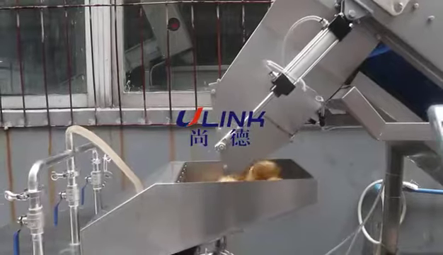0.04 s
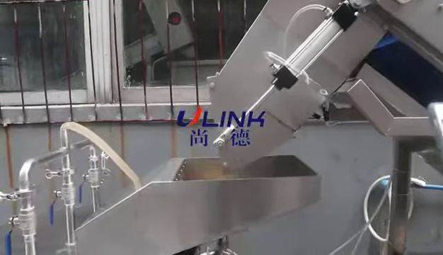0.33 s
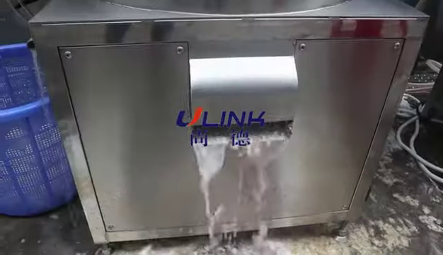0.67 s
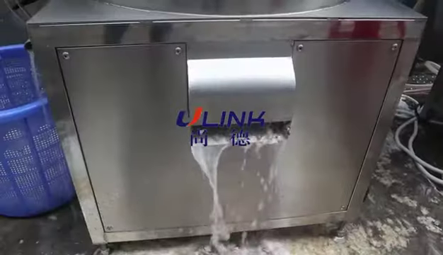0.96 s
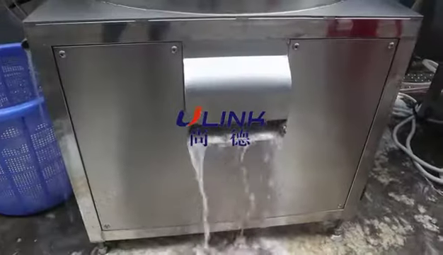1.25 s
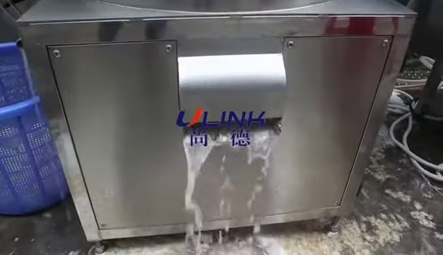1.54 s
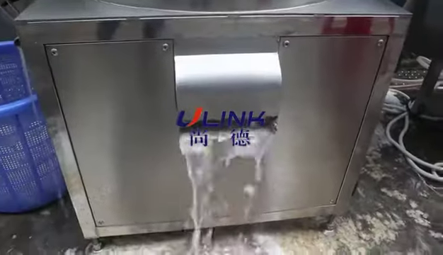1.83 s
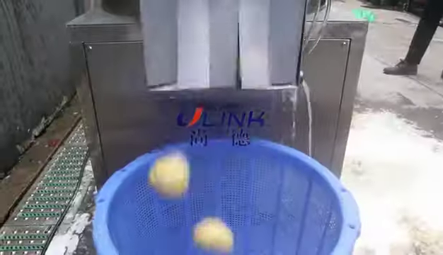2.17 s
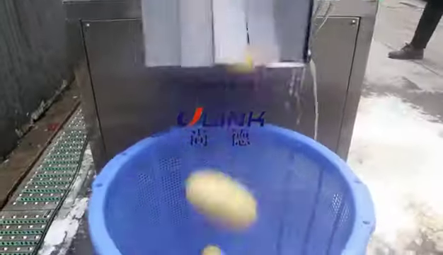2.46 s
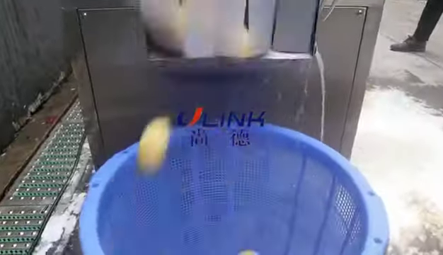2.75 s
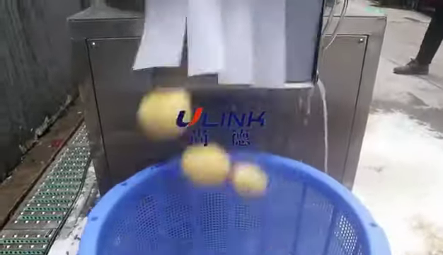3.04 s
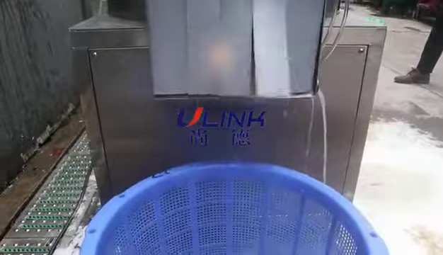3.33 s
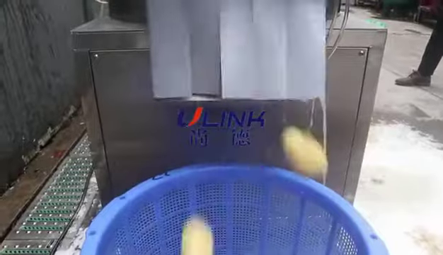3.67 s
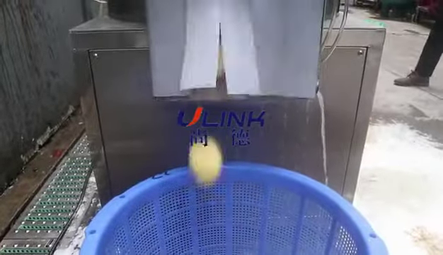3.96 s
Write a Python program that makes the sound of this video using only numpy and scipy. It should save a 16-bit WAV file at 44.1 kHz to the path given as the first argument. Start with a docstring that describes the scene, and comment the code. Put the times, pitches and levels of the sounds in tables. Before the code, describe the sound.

A potato washing machine rumbles and hums as potatoes tumble and thud in its steel drum and water splashes. Later, potatoes clang on a steel chute and knock into a plastic basket, heard nearby in a factory yard.

```python
"""A factory yard, where a potato washer is heard from three places in turn: hopper, drain and outlet.
Potatoes tumble, rub and thud in the steel drum over the rumble and hum of the drive.
Water splashes, bubbles and surges, and wet steel panels ring thinly. The level dips briefly
before the drain. At the outlet, potatoes bang on a steel chute and drop into a plastic basket."""
import sys
import numpy as np
from scipy import signal
from scipy.fft import rfft, irfft
from scipy.io import wavfile
from scipy.ndimage import uniform_filter1d

SR = 44100
rng = np.random.default_rng(int(sys.argv[2]) if len(sys.argv) > 2 else 0)


def file_out(sig):
    """Save sig as 16-bit WAV at sys.argv[1]."""
    # one column per channel
    cols = np.atleast_2d(sig).T
    # limit, then scale
    lim = np.clip(cols, -1, 1)
    pcm = np.round(lim * 32767).astype(np.int16)
    wavfile.write(sys.argv[1], SR, pcm)


N = 176400
T = np.arange(N) / SR


def gain(db):
    """Turn decibels into a number to multiply by."""
    return 10 ** (np.asarray(db) / 20)


def unit(x):
    """Scale a sound to an average (rms) level of 1."""
    return x / np.sqrt(np.mean(x ** 2) + 1e-18)


def unit_hit(x):
    """Give one hit the energy of 40 ms of sound at level 1."""
    return x / np.sqrt(np.sum(x ** 2) / (.04 * SR))


def curve(rows):
    """Join (seconds, dB) points into a changing gain."""
    return gain(np.interp(T, *np.array(rows).T))


def wander(rate):
    """Drift at random, taking `rate` new turns a second."""
    step = int(SR / rate)
    held = np.repeat(rng.standard_normal(N // step + 1), step)
    return unit(uniform_filter1d(held, step)[:N])


def colour(x, points):
    """Shape a sound by (Hz, dB) points; beyond them it falls 24 dB an octave."""
    hz, db = np.array(points).T
    octave = np.log2(np.maximum(np.fft.rfftfreq(N, 1 / SR), 1))
    outside = np.abs(octave - np.clip(octave, np.log2(hz[0]), np.log2(hz[-1])))
    return irfft(rfft(x) * gain(np.interp(octave, np.log2(hz), db) - 24 * outside), N)


def ring(x, notes):
    """Make an object ring at its (Hz, width in Hz, dB) notes; narrow ones last longer."""
    return sum(gain(db) * signal.lfilter(*signal.iirpeak(hz, hz / width, fs=SR), x)
               for hz, width, db in notes)


def soften(x, hz):
    """Soft flesh dulls a blow above this frequency."""
    return signal.sosfilt(signal.butter(2, min(hz, .4 * SR), fs=SR, output="sos"), x)


def taps(per_second, spread_db):
    """Tiny random blows of uneven size."""
    happens = rng.random(N) < per_second / SR
    size = np.minimum(rng.exponential(size=N), 4)
    return happens * rng.choice([-1, 1], N) * gain(spread_db * size)


def burst(start, decay_s, rise_s=.005):
    """Noise that builds quickly and dies away."""
    age = np.maximum(T - start, 0)
    return rng.standard_normal(N) * (1 - np.exp(-age / rise_s)) * np.exp(-np.minimum(age / decay_s, 20))


def strike(start, decay_s=.005, rub_db=-6):
    """A firm blow, then the rough rub of the skin."""
    rub = burst(start, decay_s)
    return signal.unit_impulse(N, int(start * SR)) + gain(rub_db) * rub / np.sqrt(np.sum(rub ** 2))


# The drum's notes at each place. Each row: pitch in Hz, width in Hz, strength in dB.
HOPPER_NOTES = [(203, 27, -1), (254, 28, -0.5), (277.9, 16, 13.5), (356.6, 9.1, 7.5)]
DRAIN_NOTES = [(196.8, 9.2, -0.5), (247.7, 12, 3.5), (274.8, 16, 1.5), (546.4, 7.8, -2.5)]
OUTLET_NOTES = [(65, 14, 6), (115, 26, 0), (264.6, 27, 6), (327, 16, 8.5), (363.5, 11, 2.5),
                (620, 110, -8.5)]
# How loud the tumbling is. Each row: time in seconds, level in dB.
TUMBLE_LEVEL = [(0, -22), (.25, -17), (.6, -15), (.85, -21), (1.3, -16.5), (1.75, -23), (2.05, -14),
                (2.14, -20.5), (2.3, -15.5), (2.43, -21.5), (2.52, -15), (2.68, -20.5), (3.2, -28),
                (3.47, -39.5), (3.58, -21), (3.71, -27), (4, -20.5)]

def tumbling(notes):
    """Many soft potato knocks keep the steel drum ringing."""
    knocks = soften(taps(per_second=300, spread_db=2.2), hz=505)
    return unit(ring(knocks, notes)) * curve(TUMBLE_LEVEL)


# The rumble's tone. Each row: frequency in Hz, strength in dB.
RUMBLE_TONE = [(34, 3), (50, -2), (115, 2.5), (160, -6.5), (300, 1.5), (450, -18.5), (850, -27)]
# Its level in dB at the hopper, drain and outlet.
RUMBLE_DB = (-23, -22.5, -23)

def rumble(place):
    """The drive and frame shake with a deep noise."""
    return gain(RUMBLE_DB[place]) * unit(colour(rng.standard_normal(N), RUMBLE_TONE))


# The drive's tones. Each row: pitch in Hz, level in dB.
HUM_NOTES = [(52, -33), (93, -34)]

def drive_hum(waver=.015):
    """The drive hums low, wavering a little in pitch."""
    out = 0
    for hz, db in HUM_NOTES:
        pitch = hz * (1 + waver * wander(10))
        out += gain(db) * unit(np.sin(2 * np.pi * np.cumsum(pitch) / SR))
    return out


def bubbles(per_second=260, cycles=26, rise=.12):
    """Each bubble gives a rising ping; higher ones are shorter and weaker."""
    out = np.zeros(N + SR)
    for when, pitch, size in rng.random((int(per_second * N / SR), 3)):
        hz = 700 * 7 ** pitch
        age = np.arange(int(2 * cycles * SR / hz)) * hz / SR / cycles
        ping = np.sin(2 * np.pi * cycles * age * (1 + rise * age / 2))
        start = int(when * N)
        out[start:start + len(age)] += size ** 2 * np.exp(-3 * age) * ping * 700 / hz
    return unit(out[:N])


# The tone of the splashing. Each row: frequency in Hz, strength in dB.
SPLASH_TONE = [(300, 6), (600, 7.5), (1000, -1), (1600, -3.5), (2600, -7), (3400, -11.5), (4800, -21.5),
               (7600, -25.5)]
# The flow of water. Each row: time in seconds, level in dB.
FLOW_LEVEL = [(0, -33.5), (.4, -30.5), (.85, -29), (1.05, -28), (2.05, -27.5), (2.4, -27.5), (2.58, -24),
              (2.8, -28.5), (2.92, -30.5), (3.17, -33.5), (3.3, -29.5), (3.48, -32), (3.59, -26.5),
              (3.7, -30.5), (3.9, -24), (4, -27.5)]

def splashing(flicker_db=1.4, bubble_db=-10):
    """Thousands of drops and some bubbles swell and fade with the flow."""
    drops = unit(colour(taps(per_second=5000, spread_db=2), SPLASH_TONE))
    flicker = gain(flicker_db * wander(25.02))
    return curve(FLOW_LEVEL) * (drops * flicker + gain(bubble_db) * bubbles())


# The panels' notes. Each row: pitch in Hz, width in Hz, strength in dB.
PANEL_NOTES = [(1254, 37, 9.5), (1836, 70, -3), (2482, 7.3, -1), (4210, 21, -3.5)]

def panels(db):
    """Tiny taps make the wet steel panels ring thinly."""
    return gain(db) * unit(ring(taps(per_second=300, spread_db=2.2), PANEL_NOTES))


def swell(peak, half_length):
    """A smooth rise and fall around one moment."""
    return np.exp(-((T - peak) / half_length) ** 2 / 2)


# Drum groans. Each row: peak time in seconds, half length in seconds, pitch in Hz, level in dB.
GROANS = [(0.415, 0.32, 284.9, -25), (.43, 0.12, 745, -30.5), (0.959, 0.042, 271.1, -15.5),
          (1.603, 0.2, 273, -17)]

def groans(wander_hz=7.016, flutter_db=.5):
    """Potatoes stick and slip on the drum wall, drawing out an unsteady tone."""
    out = 0
    for peak, half_length, hz, db in GROANS:
        tone = np.sin(2 * np.pi * np.cumsum(hz + wander_hz * wander(45)) / SR)
        out += gain(db) * swell(peak, half_length) * unit(tone * gain(flutter_db * wander(40)))
    return out


# Thuds in the drum. Each row: start in seconds, level in dB, pitch in Hz.
THUDS = [(0.706, -11, 222.7), (0.723, -13, 241.4), (0.745, -18.5, 245.5), (.82, -19.5, 262.6),
         (1.23, -20.5, 238.5), (1.286, -15, 290), (1.399, -15, 263.3), (1.52, -13, 243), (1.59, -15, 258),
         (1.819, -17, 268.5), (1.96, -21.5, 301), (2.521, -18.5, 333), (2.60, -16, 280),
         (3.329, -25.5, 256), (3.527, -21.5, 325.5), (3.787, -18, 339.5), (3.85, -18.5, 351.5)]
# The wall's notes. Each row: multiple of the thud's pitch, width in Hz, strength in dB.
WALL_NOTES = [(0.371, 13, 0.5), (0.729, 21, -5.5), (1.001, 13, 6)]

def thuds():
    """Heavy potatoes hit the drum wall, which rings low."""
    out = 0
    for start, db, hz in THUDS:
        wall = [(hz * multiple, width, note_db) for multiple, width, note_db in WALL_NOTES]
        out += gain(db) * unit_hit(ring(soften(strike(start), hz=505), wall))
    return out


# Water surges. Each row: peak time in seconds, half length in seconds, level in dB.
SURGES = [(0.719, 0.011, -25.5), (0.966, 0.017, -34), (1.397, 0.018, -27.5), (1.589, 0.03, -32.5),
          (2.349, 0.042, -32.5), (2.483, 0.0097, -28)]
# The spray's tone. Each row: frequency in Hz, strength in dB.
SPRAY_TONE = [(500, 6.5), (1200, 5), (2900, 5), (4000, -5.5), (5800, -5), (7800, -20)]

def surges():
    """Each surge of water throws a short, dense spray."""
    level = sum(gain(db) * swell(peak, half_length) for peak, half_length, db in SURGES)
    return level * unit(colour(taps(per_second=10000, spread_db=2), SPRAY_TONE))


# Hits on the chute. Each row: start in seconds, level in dB, contact time in seconds,
# slap compared with clang in dB, frequency in Hz above which the hit is dulled.
CHUTE_HITS = [(1.952, -22, 0.018, 2.5, 1770), (2.716, -17, 0.016, -3.5, 4020),
              (2.987, -13.5, 0.0073, -5.5, 6900), (3.239, -23, 0.0094, 0, 2830)]
# The chute's notes. Each row: pitch in Hz, width in Hz, strength in dB.
CHUTE_NOTES = [(338, 16, 7.5), (586, 20, -4.5), (651, 18, -1.5), (1267, 80, -9.5), (1858, 15, 7),
               (2110, 100, -6.5), (2470, 58, -3)]
# The tone of a wet, peeled potato's slap. Each row: frequency in Hz, strength in dB.
SLAP_TONE = [(200, -2), (500, 4.5), (1000, -2.5), (2400, -7), (4300, -12.5), (7600, -16)]

def chute_bangs(squash_s=.003):
    """A wet potato slaps down, squashes a little and sets the steel clanging."""
    out = 0
    for start, db, contact_s, slap_db, dull_hz in CHUTE_HITS:
        slap = colour(burst(start, contact_s), SLAP_TONE)
        clang = ring(soften(strike(start + squash_s, contact_s), hz=1200), CHUTE_NOTES)
        bang = unit_hit(clang) + gain(slap_db) * unit_hit(slap)
        out += gain(db) * unit_hit(soften(bang, dull_hz))
    return out


# Drops into the basket. Each row: start in seconds, level in dB, pitch in Hz,
# wet smack compared with knock in dB.
BASKET_HITS = [(2.139, -17.5, 710, -17), (2.492, -26, 900, -9), (2.629, -16.5, 880, -3.5),
               (3.052, -24.5, 950, -4)]
# The basket's notes. Each row: pitch in Hz, width in Hz, strength in dB.
BASKET_NOTES = [(430, 34, 1), (655, 70, 8.5), (998, 51, -11), (1360, 70, -7.5)]

def basket_drops(flesh_width_hz=330, give_s=.003, plastic_db=-2):
    """A potato lands with a hollow knock and a smack; the plastic gives and rings."""
    out = 0
    for start, db, hz, smack_db in BASKET_HITS:
        flesh = [(hz, flesh_width_hz, 0)]
        knock = ring(ring(strike(start), flesh), flesh)
        plastic = ring(soften(strike(start + give_s), hz=1720), BASKET_NOTES)
        smack = soften(colour(burst(start, decay_s=.005), SLAP_TONE), hz=3200)
        landing = unit_hit(knock) + gain(plastic_db) * unit_hit(plastic) + gain(smack_db) * unit_hit(smack)
        out += gain(db) * unit_hit(landing)
    return out


def yard_echo(x, echo_s=.17, echo_db=-8):
    """Walls and steel add a short, blurred echo."""
    tail = burst(.006, echo_s / np.log(1000))  # falls 60 dB in echo_s
    return x + gain(echo_db) * signal.fftconvolve(x, tail / np.sqrt(np.sum(tail ** 2)))[:N]


def fade_in(moment, fade_s=.012):
    """Go quickly from 0 to 1 around a moment."""
    return np.clip((T - moment) / fade_s + .5, 0, 1)


# The brief dip between hopper and drain. Each row: time in seconds, level change in dB.
LEVEL_DIP = [(.646, 0), (.65, -27), (.671, -42), (.693, -20), (.705, 0)]

def washer(drain_start_s=.67, outlet_start_s=1.95):
    """The whole machine, heard from three places in turn."""
    hopper, outlet = 1 - fade_in(drain_start_s), fade_in(outlet_start_s)
    drain = 1 - hopper - outlet
    places = [(hopper, HOPPER_NOTES), (drain, DRAIN_NOTES), (outlet, OUTLET_NOTES)]
    drum = sum(share * (tumbling(notes) + rumble(i)) for i, (share, notes) in enumerate(places))
    machine = drum + panels(db=-40 - 2.5 * outlet) + groans() + drive_hum()
    hits = yard_echo(thuds() + chute_bangs() + basket_drops())
    water = splashing() + surges()
    dip = curve(LEVEL_DIP)
    return dip * (machine + hits) + np.cbrt(dip) * water  # water dips a third as many dB


# Stereo width. Each row: frequency in Hz, sides compared with middle in dB.
STEREO_WIDTH = [(30, -57.5), (250, -25), (500, -22.5), (1000, -18.5), (2000, -11), (4000, -1), (7500, 1)]

def scene():
    """The bass sits in the middle and the treble spreads wide."""
    middle = washer()
    side = colour(signal.hilbert(washer()).imag, STEREO_WIDTH)  # waves shifted a quarter cycle
    return np.array([middle + side, middle - side])


def record(dry, low_cut_hz=42, ceiling=1.2, top_hz=7550):
    """The microphone drops the deep bass, rounds the peaks and cuts the top."""
    x = signal.sosfilt(signal.butter(4, low_cut_hz, "high", fs=SR, output="sos"), dry)
    rounded = ceiling * np.tanh(x / ceiling)
    return signal.sosfilt(signal.ellip(10, .2, 85, top_hz, fs=SR, output="sos"), rounded)


dry = scene()
out = record(dry)
file_out(out)
```